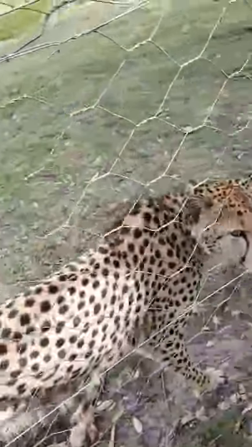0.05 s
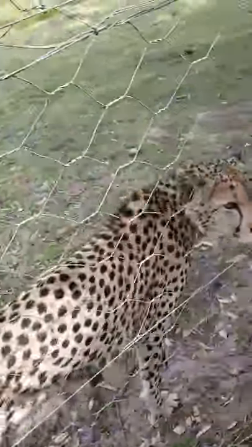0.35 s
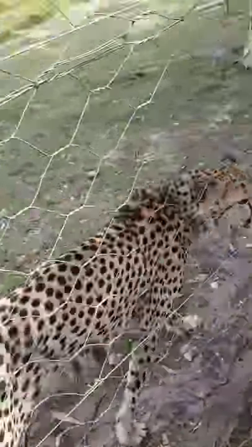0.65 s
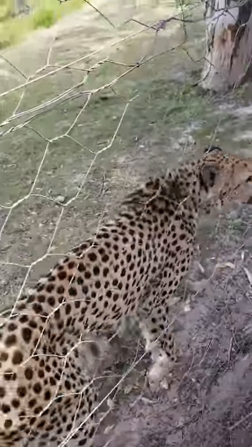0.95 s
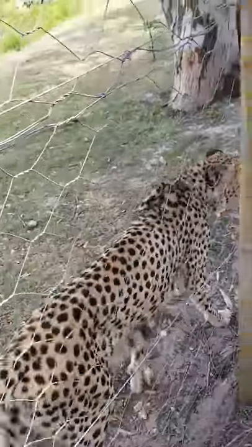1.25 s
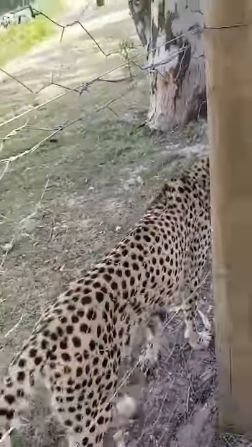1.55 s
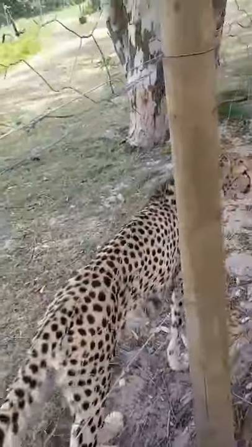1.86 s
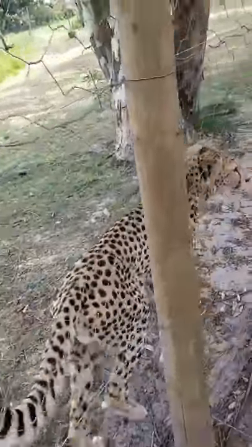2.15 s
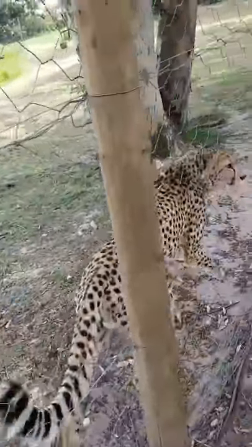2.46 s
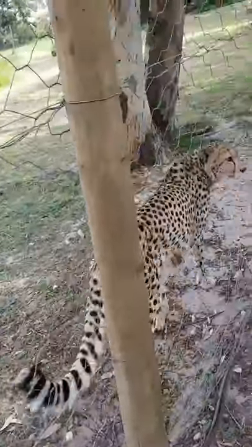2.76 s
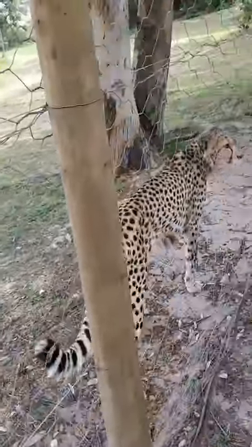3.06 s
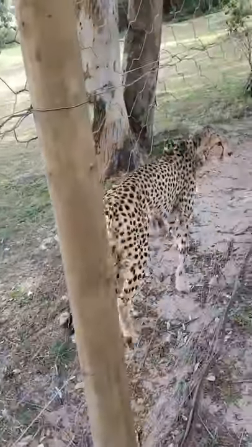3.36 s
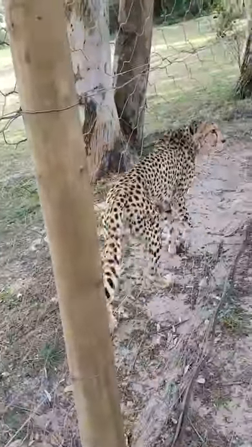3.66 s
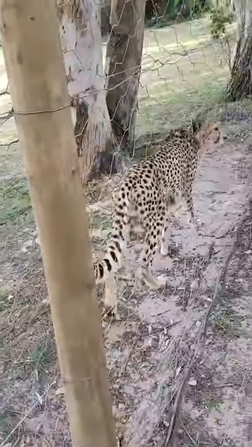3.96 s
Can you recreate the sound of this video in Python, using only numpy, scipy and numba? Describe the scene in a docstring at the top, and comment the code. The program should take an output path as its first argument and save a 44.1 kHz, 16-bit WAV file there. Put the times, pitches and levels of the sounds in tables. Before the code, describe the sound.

Gusty wind rumbles and crackles on the microphone, with faint distant bird whistles.

```python
"""Wind rumbles and flutters: gusts buffet the two ports of a hand-held microphone, the right one harder.
Large eddies make the rumble, small ones the flutter; air breaking away at the right port
crackles, sputters and slaps. A big cat pads faintly over dry leaves.
Far off, a bird repeats a rising and a falling whistle over a faint outdoor hiss."""
import sys
import numpy as np
from scipy import signal
from scipy.fft import rfft, irfft
from scipy.io import wavfile
from scipy.ndimage import uniform_filter1d
from numba import njit

SR = 44100
rng = np.random.default_rng(int(sys.argv[2]) if len(sys.argv) > 2 else 0)


def digitize_waveform(pressure):
    """Quantize a signal to 16-bit integers and store it at the path in sys.argv[1].

    Rows of a 2-D input are taken as channels; values are limited to [-1, 1].
    """
    field = np.atleast_2d(pressure).T
    bounded = np.clip(field, -1, 1)
    quanta = np.round(bounded * 32767).astype(np.int16)
    wavfile.write(sys.argv[1], SR, quanta)


N = 176400
TIME = np.arange(N) / SR

# wind balance between the ports: time_s, left_minus_right_db
PORT_BALANCE = [(0, -10), (.75, -8), (1.8, -8.5), (2.7, -7.5), (3.2, -30), (3.35, -14.5), (3.6, -28),
                (3.7, 8), (3.81, 2), (3.87, -24)]
# spectrum of a pressure spike: freq_hz, gain_db
SPIKE_SPECTRUM = [(60, -1), (300, 8.5), (600, 5), (1000, 1.5), (2000, -7.5), (3500, -14.5), (5000, -15.5),
                  (8000, -16.5), (16000, -17)]
LUMP_RATE_HZ, LEVELLING_S, SPIKE_SPREAD_DB = 38, 0.034, 4.5


def from_db(db):
    """Decibels to gain."""
    return 10 ** (np.asarray(db) / 20)


def unit_rms(x):
    """Scale to unit rms."""
    return x / np.sqrt(np.mean(x ** 2) + 1e-20)


def curve(points):
    """Interpolate (time_s, value) points at every sample."""
    return np.interp(TIME, *np.transpose(points))


def colour(x, spectrum):
    """Filter by (freq_hz, gain_db) points."""
    freq_hz, gain_db = np.transpose(spectrum)
    bins_hz = np.maximum(np.fft.rfftfreq(N, 1 / SR), 1)
    return irfft(rfft(x) * from_db(np.interp(np.log(bins_hz), np.log(freq_hz), gain_db)), N)


def drift(rate_hz):
    """Unit-rms random wander, mostly below rate_hz."""
    bins_hz = np.fft.rfftfreq(N, 1 / SR)
    return unit_rms(irfft(rfft(rng.standard_normal(N)) / (1 + (bins_hz / rate_hz) ** 2), N))


def running_rms(x, window_s):
    """Smoothed short-term level."""
    size = int(window_s * SR)
    power = uniform_filter1d(uniform_filter1d(x * x, size), size // 2)
    return np.sqrt(np.abs(power) + 1e-20)


def butter(corner_hz, kind):
    """Order-2 maximally flat filter sections."""
    return signal.butter(2, corner_hz, kind, fs=SR, output="sos")


@njit
def state_variable(x, step, damping):
    """Low-pass output of a two-pole state-variable filter."""
    out, band, low = np.zeros(len(x)), 0., 0.
    for i in range(len(x)):
        g = step[i]
        v = (band + g * (x[i] - low)) / (1 + g * (g + damping))
        out[i] = low + g * v
        band, low = 2 * v - band, 2 * out[i] - low
    return out


def low_pass(x, corner_hz, damping=np.sqrt(2), stages=1):
    """Two poles a stage, at a steady or moving corner."""
    step = np.tan(np.pi * np.clip(corner_hz, 20, 19000) / SR) * np.ones(N)
    for _ in range(stages):
        x = state_variable(x, step, damping)
    return x


def port_gains(level_db, balance_db):
    """Left and right gains; the balance leaves their joint power unchanged."""
    pair = from_db(np.array([balance_db, -balance_db]) / 2)
    return 2 * from_db(level_db) * pair / np.sqrt((pair ** 2).sum(0))


def hiss(level_db=-47, balance_db=0.6):
    """Smooth far-off outdoor noise that dips under the strongest gusts."""
    # freq_hz, gain_db
    spectrum = [(100, 21.5), (1000, 10.5), (2000, 8), (3000, 8), (4000, 2), (6800, -1), (8200, 1.2),
                (9400, -3), (11500, -2), (14000, -6.5), (16000, -9)]
    # time_s, gain_db
    dips = [(0, 0.5), (1.8, -1), (2.0, -1), (2.5, -4), (2.8, -1), (3.5, -1.5), (3.8, -2), (4, -9.5)]
    pan = from_db(np.array([[balance_db], [-balance_db]]) / 2)
    noise = unit_rms(colour(rng.standard_normal((2, N)), spectrum))
    return pan * from_db(level_db + curve(dips)) * noise


def bird(glide_share=0.88, waver=0.00323, flicker_db=3, echo_decay_s=0.13, echo_db=-5):
    """Pure whistles that glide, then hold their pitch, scattered by the trees."""
    # rising notes: start_s, length_s, start_hz, end_hz, level_db, swell (above 1: loudest late)
    rises = [(1.52, 0.23, 2350, 2544, -55.5, 1.1), (1.70, 0.062, 2520, 2720, -48.5, 1.8),
             (2.40, .33, 2420, 2820, -54, 0.99), (3.28, .35, 2438, 2796, -48, 1.9)]
    # falling notes: same columns
    falls = [(2.06, 0.11, 2770, 2620, -53.5, 1), (2.96, 0.11, 2820, 2530, -51, 1),
             (3.83, 0.125, 2820, 2630, -49.5, 1.0)]
    song = np.zeros(N)
    wobble = 1 + waver * drift(38)
    for notes, bend in ((rises, 1.7), (falls, 0.8)):
        for start_s, length_s, start_hz, end_hz, level_db, swell in notes:
            progress = np.clip((TIME - start_s) / length_s, 0, 1)
            glide = np.minimum(progress / glide_share, 1) ** bend
            pitch_hz = (start_hz + (end_hz - start_hz) * glide) * wobble
            envelope = np.sin(np.pi * progress ** swell).clip(0) ** 0.39
            song += from_db(level_db) * envelope * np.sin(2 * np.pi * np.cumsum(pitch_hz) / SR)
    song *= from_db(flicker_db * drift(38))
    tails = rng.standard_normal((2, SR)) * np.exp(-TIME[:SR] / echo_decay_s)
    tails /= np.sqrt((tails ** 2).sum(1, keepdims=True))
    return song + from_db(echo_db) * signal.fftconvolve(song[None], tails, axes=1)[:, :N]


def paw_steps(attack_s=0.001, grain_db=4, leaf_q=1 / 0.32):
    """Each paw crushes dry leaves in a brief, thin, grainy burst."""
    # start_s, level_db, decay_s, pitch_hz
    footfalls = [(.432, -54, 0.06, 10400), (.872, -54, .012, 14800), (1.096, -51.5, 0.028, 11100),
                 (3.506, -50, 0.0085, 11900)]
    grains = rng.standard_normal((2, N)) * from_db(grain_db * drift(300))
    out = np.zeros((2, N))
    for start_s, level_db, decay_s, pitch_hz in footfalls:
        age_s = np.maximum(TIME - start_s, 0)
        envelope = np.minimum(age_s / attack_s, 1) * np.exp(-age_s / decay_s)
        leaf = signal.iirpeak(pitch_hz, leaf_q, fs=SR)
        crunch = signal.lfilter(*leaf, signal.lfilter(*leaf, grains))
        out += from_db(level_db) * envelope * unit_rms(crunch)
    return out


def add_puffs(wind_db, gain_db=0, sigma_s=0.0047):
    """Wind level in dB plus the separate puffs of the lull, each swelling and dying."""
    # centre_s, level_db
    puffs = [(.63, -31.5), (.68, -43), (0.724, -33), (0.753, -33), (.835, -62), (.885, -45), (0.929, -35),
             (0.974, -38), (1.052, -36), (1.1, -36.5)]
    power = from_db(wind_db) ** 2
    for centre_s, level_db in puffs:
        power += from_db(level_db + gain_db) ** 2 * np.exp(-0.5 * ((TIME - centre_s) / sigma_s) ** 2)
    return 10 * np.log10(power)


def rumble(gain_db=1.32, lump_db=5.5, deep_hz=62, balance_share=0.41):
    """Large eddies push on each port in separate lumps; only strong gusts reach the deepest bass."""
    # large-eddy strength: time_s, relative_db
    gusts = [(0.0, -26.5), (0.1, -32), (0.2, -40), (0.38, -30), (0.49, -30.5), (0.55, -42), (0.65, -35.5),
             (1.01, -42.5), (1.2, -45), (1.32, -34), (1.6, -42), (1.66, -39.5), (1.76, -43), (1.86, -27),
             (2.06, -31.5), (2.25, -26), (2.44, -34.5), (2.49, -27.5), (2.62, -37), (2.76, -25.5),
             (2.94, -35), (2.99, -28), (3.11, -21.5), (3.69, -18.5), (3.77, -23.5), (3.85, -16),
             (3.98, -15)]
    # freq_hz, gain_db
    spectrum = [(12, -71), (28, -6.5), (60, 2.5), (115, 1.5), (175, -0.5), (260, -9), (400, -22.5),
                (800, -65), (2000, -101)]
    gust_db = curve(gusts)
    deep_gain = from_db(0.9 * (gust_db - gust_db.max()))
    ports = []
    for _ in range(2):
        lumps = rng.standard_normal(N) * from_db(lump_db * drift(LUMP_RATE_HZ))
        pressure = colour(lumps, spectrum)
        pressure += (deep_gain - 1) * signal.sosfiltfilt(butter(deep_hz, "low"), pressure)
        ports.append(pressure / running_rms(pressure, 2 * LEVELLING_S))
    level_db = add_puffs(gust_db, gain_db=-3.5) + gain_db
    return port_gains(level_db, balance_share * curve(PORT_BALANCE)) * np.array(ports)


def flutter(gain_db=0.5, lump_db=4.5, low_edge_hz=248):
    """Small eddies make a steep-sided noise band, brightest in the middle gust, duller at the end."""
    # small-eddy strength: time_s, relative_db
    gusts = [(0.0, -33), (0.02, -49.5), (0.09, -24), (0.21, -44.5), (0.33, -39), (0.35, -25.5),
             (0.44, -39.5), (0.5, -24), (0.55, -46), (0.6, -39.5), (1.2, -50.5), (1.33, -31), (1.37, -42),
             (1.4, -29.5), (1.48, -49), (1.52, -33), (1.61, -46.5), (1.63, -32.5), (1.74, -47),
             (1.78, -23.5), (1.81, -45), (1.82, -24.5), (2.03, -14), (2.06, -19.5), (2.19, -16),
             (2.22, -22.5), (2.32, -21), (2.43, -32), (2.51, -19.5), (2.58, -37.5), (2.695, -19),
             (2.73, -31), (2.785, -22.5), (2.95, -45), (2.98, -21.5), (3.01, -33), (3.07, -20.5),
             (3.1, -27.5), (3.13, -18.5), (3.24, -23), (3.27, -32.5), (3.45, -20.5), (3.5, -41.5),
             (3.6, -26.5), (3.77, -31.5), (3.86, -17), (3.89, -36.5), (3.92, -17.5), (3.95, -29),
             (3.98, -17.5)]
    # time_s, pitch_hz
    eddy_pitch = [(0, 453), (.5, 328), (1.8, 346), (2.0, 535), (2.7, 498), (3.15, 452), (3.35, 328)]
    pitch_hz = curve(eddy_pitch)
    ports = []
    for _ in range(2):
        lumps = rng.standard_normal(N) * from_db(lump_db * drift(LUMP_RATE_HZ))
        band = signal.sosfilt(butter(low_edge_hz, "high"), lumps)
        band = low_pass(band, pitch_hz, damping=1.08, stages=2)
        band = low_pass(band, 2 * pitch_hz)
        ports.append(band / running_rms(band, LEVELLING_S))
    level_db = add_puffs(curve(gusts)) + gain_db
    return port_gains(level_db, curve(PORT_BALANCE)) * np.array(ports)


def crackle(gain_db=5, clump_db=4, clump_rate_hz=57, wash_gain=0.062):
    """Air breaks away at the port in clumps of uneven pressure spikes; sharper ones are rarer."""
    # mid-band strength: time_s, relative_db
    strength = [(0.0, -42), (0.03, -58), (0.1, -45.5), (0.16, -52.5), (0.4, -52), (1.22, -62.5),
                (1.36, -49), (1.44, -63), (1.65, -52.5), (1.79, -60), (1.85, -35.5), (1.92, -39.5),
                (1.99, -28.5), (2.09, -45.5), (2.11, -31.5), (2.19, -38.5), (2.24, -45.5), (2.3, -40.5),
                (2.42, -54), (2.65, -61), (2.69, -41.5), (2.73, -52), (2.96, -51), (3.07, -40), (3.09, -60),
                (3.11, -33), (3.24, -36), (3.27, -59), (3.41, -43), (3.55, -79), (3.6, -37), (3.62, -69),
                (3.8, -66), (3.86, -37.5), (3.89, -61), (3.92, -38), (3.95, -54), (3.97, -37.5)]
    # upper edge of the middling spikes: time_s, edge_hz
    edge = [(0, 3040), (1.2, 2360), (1.8, 3320), (1.88, 4700), (2.2, 3620), (2.32, 4630), (2.45, 2560),
            (3.2, 1930), (3.32, 1230)]
    clumps = from_db(clump_db * drift(clump_rate_hz))
    pressure = np.zeros(N)
    for sharpness in (1 / 1.7, 1, 1.7):
        spikes_per_s = 150 / sharpness ** 2
        sizes = from_db(SPIKE_SPREAD_DB * np.minimum(rng.exponential(1, N), 4))
        signs = rng.choice([-1, 1], N)
        clicks = sizes * signs * (rng.random(N) < spikes_per_s / SR)
        wash = wash_gain * rng.standard_normal(N)
        spikes = colour((clicks + wash) * clumps, SPIKE_SPECTRUM)
        pressure += low_pass(spikes, curve(edge) * sharpness, stages=2)
    mid_band = signal.sosfiltfilt(butter([800, 1700], "band"), pressure)
    return from_db(curve(strength) + gain_db) * pressure / running_rms(mid_band, 2 * LEVELLING_S)


def sputters(spikes_per_s=500):
    """The flow tears off the port in short ragged runs of spikes that swell and die."""
    # timed at half amplitude: start_s, width_s, level_db
    runs = [(0.121, .022, -33), (1.344, .012, -45), (1.659, .009, -40.5), (2.327, 0.028, -35.5),
            (2.362, .012, -35), (2.43, .008, -34), (2.476, 0.02, -37.5), (2.514, 0.013, -36),
            (2.563, .009, -34), (2.6, .025, -37), (2.663, 0.0089, -32.5), (2.722, 0.029, -35.5),
            (2.767, .009, -35), (2.79, 0.026, -33.5), (2.841, 0.0085, -35), (2.854, .012, -29.5),
            (2.903, 0.018, -34.5), (2.95, 0.015, -38)]
    # freq_hz, gain_db
    spectrum = [(100, -12), (700, 12.5), (1900, 1.5), (3300, -3), (4900, -15.5), (7000, -32)]
    clicks = np.zeros(N)
    for start_s, width_s, level_db in runs:
        count = int(2 * width_s * spikes_per_s) + 1
        progress = (np.arange(count) + rng.random(count)) / count
        times_s = start_s + width_s * (2 * progress - 0.5)
        sizes = from_db(SPIKE_SPREAD_DB * rng.standard_normal(count)) * rng.choice([-1, 1], count)
        run = unit_rms(sizes * np.sin(np.pi * progress) ** 2)
        clicks[(times_s * SR).astype(int)] += from_db(level_db) * run * np.sqrt(width_s * SR / count)
    filter_gain = np.linalg.norm(colour(signal.unit_impulse(N), spectrum))
    return colour(clicks, spectrum) / filter_gain


def slaps(low_edge_ratio=0.17):
    """Air hits the port in single large spikes; the sharper, the shorter and thinner."""
    # time_s, peak_db, edge_hz
    hits = [(1.759, -26, 3500), (1.822, -26.5, 2800), (1.872, -27, 8000), (1.909, -20.5, 9800),
            (1.956, -14.5, 10700), (1.990, -14.5, 16200), (1.997, -18, 13000), (2.002, -20, 3960),
            (2.116, -21, 14000), (2.133, -23, 11000), (2.161, -30, 2500), (2.226, -17, 3000),
            (2.281, -24, 7000), (2.295, -19.5, 6000), (2.303, -25, 8950), (2.348, -24, 11000),
            (2.687, -13, 1500), (3.074, -12, 1520), (3.112, -10.5, 2110), (3.165, -13, 2470),
            (3.413, -14, 1060), (3.438, -14, 1430), (3.600, -8.5, 1200), (3.651, -9.5, 800),
            (3.966, -9, 1600)]
    spike = np.roll(colour(signal.unit_impulse(N), SPIKE_SPECTRUM), N // 2)
    out = np.zeros(N)
    for time_s, peak_db, edge_hz in hits:
        slap = low_pass(spike, edge_hz, stages=2)
        slap = signal.sosfilt(butter(low_edge_ratio * edge_hz, "high"), slap)
        slap *= rng.choice([-1, 1]) * from_db(peak_db) / np.abs(slap).max()
        out += np.roll(slap, int(time_s * SR) - N // 2)
    return out


def scene():
    """Wind on both ports, spikes on the right one only, the quiet outdoors behind."""
    right_spikes = np.array([np.zeros(N), crackle() + slaps() + sputters()])
    return rumble() + flutter() + right_spikes + paw_steps() + bird() + hiss()


def record(dry):
    """Round the highest peaks and cut the top treble."""
    cutoff_hz = 15720
    rounded = dry / (1 + dry ** 6) ** (1 / 6)
    return signal.sosfilt(signal.ellip(12, 0.1, 80, cutoff_hz, fs=SR, output="sos"), rounded)


dry = scene()
out = record(dry)
digitize_waveform(out)
```